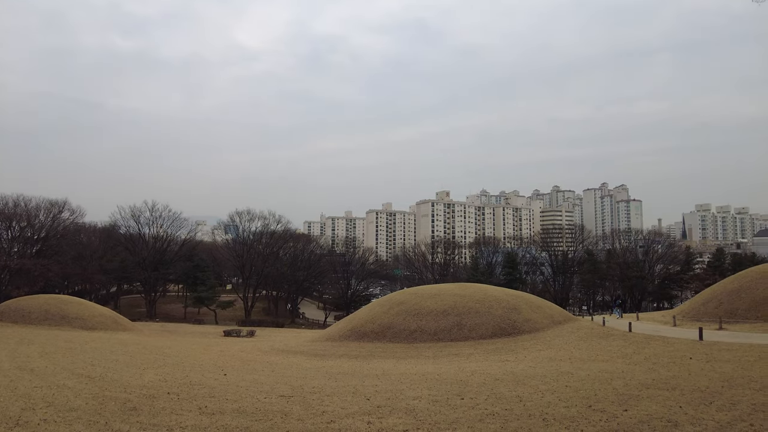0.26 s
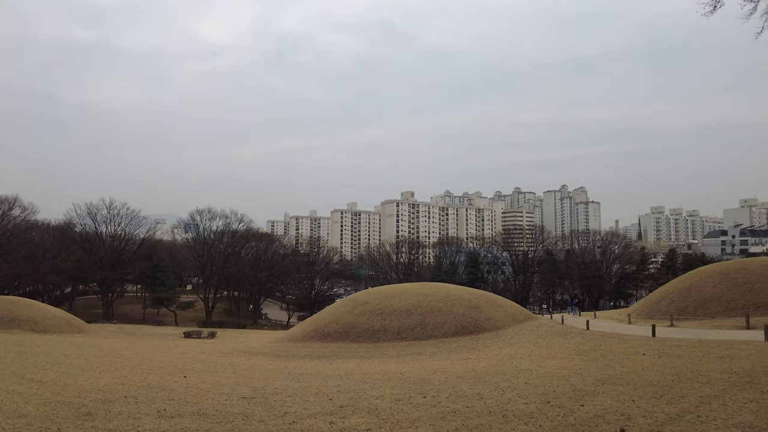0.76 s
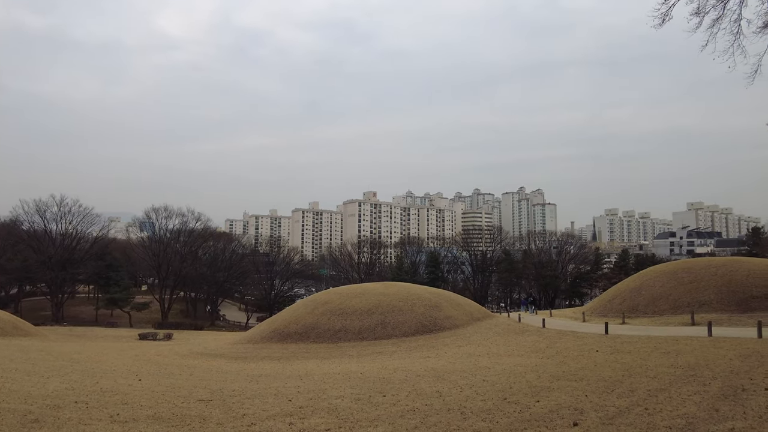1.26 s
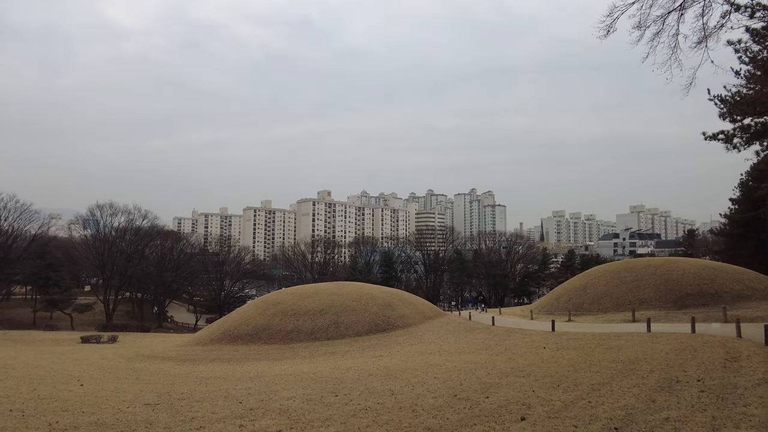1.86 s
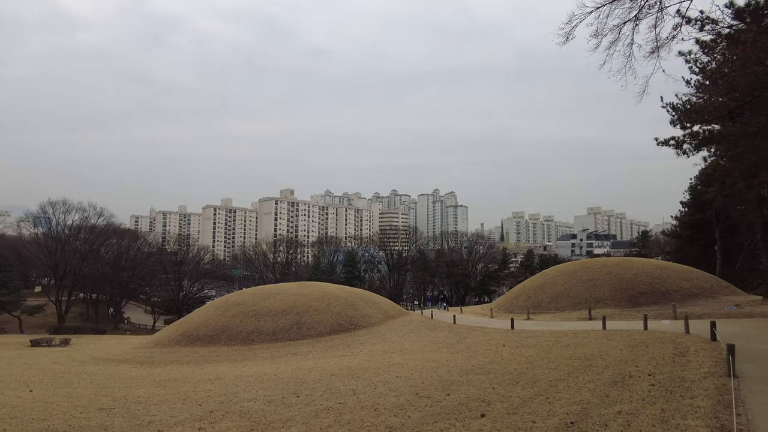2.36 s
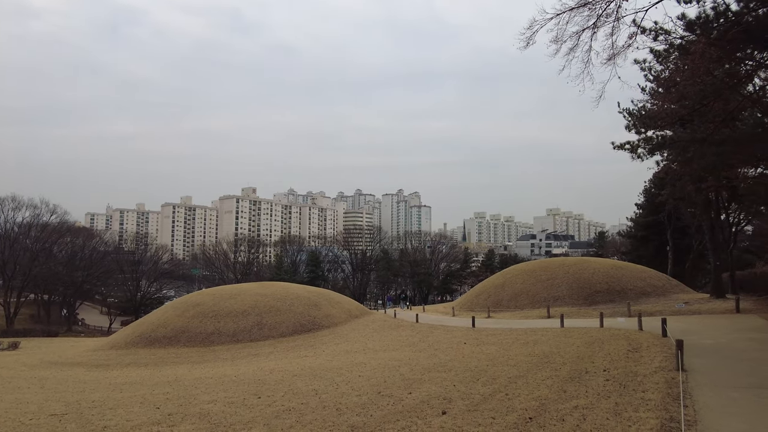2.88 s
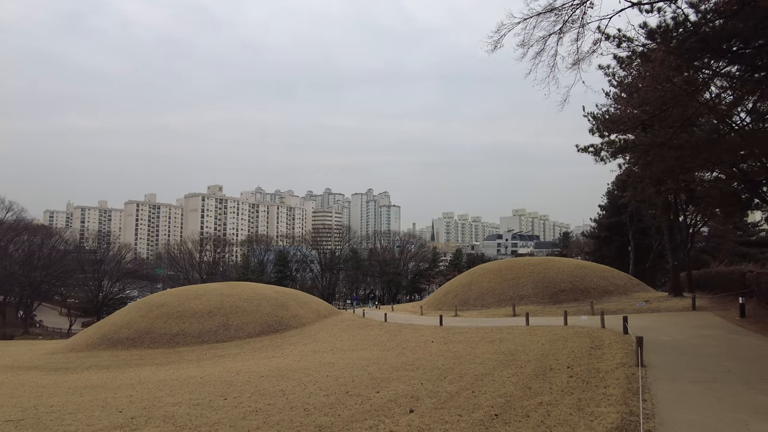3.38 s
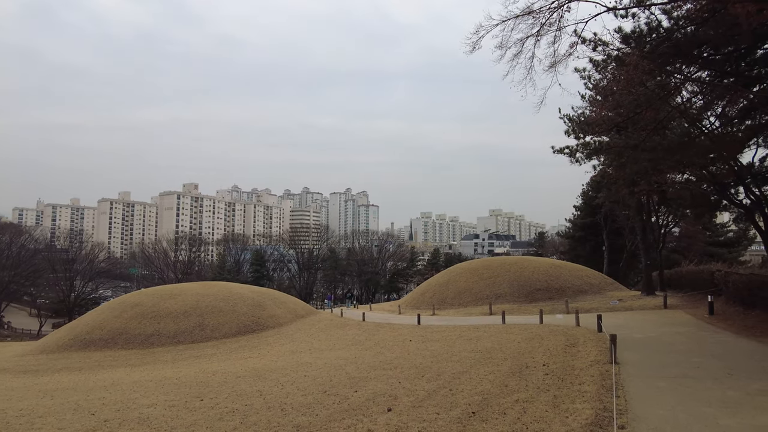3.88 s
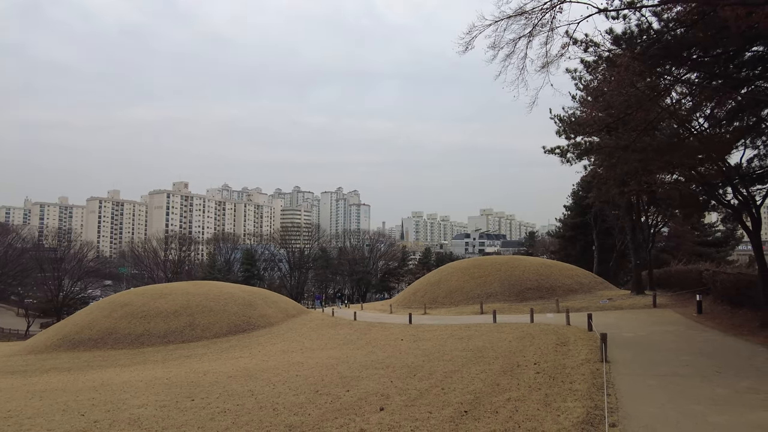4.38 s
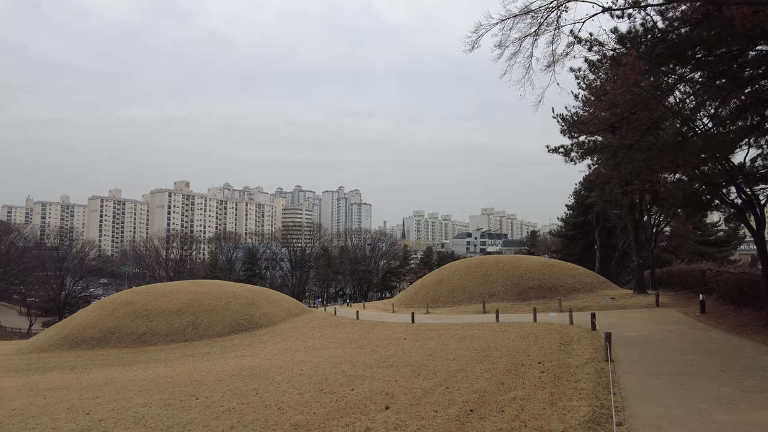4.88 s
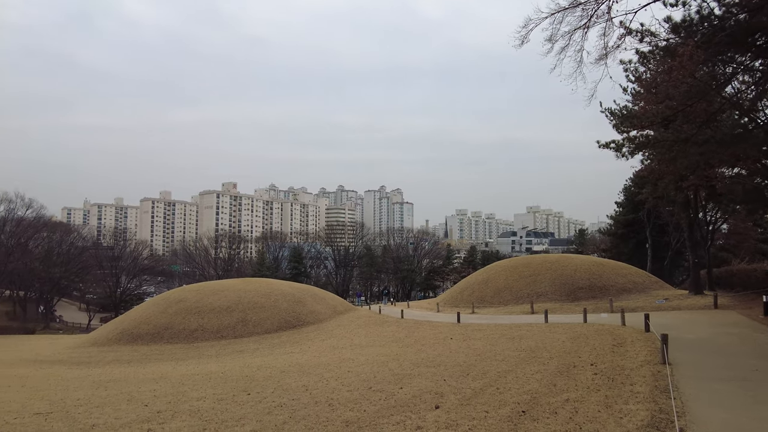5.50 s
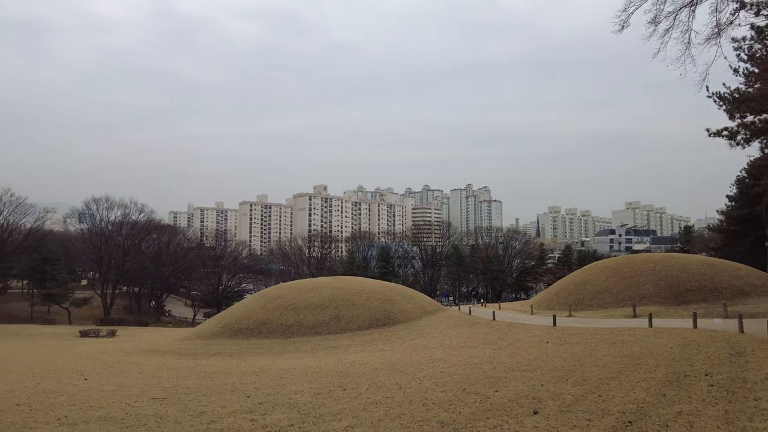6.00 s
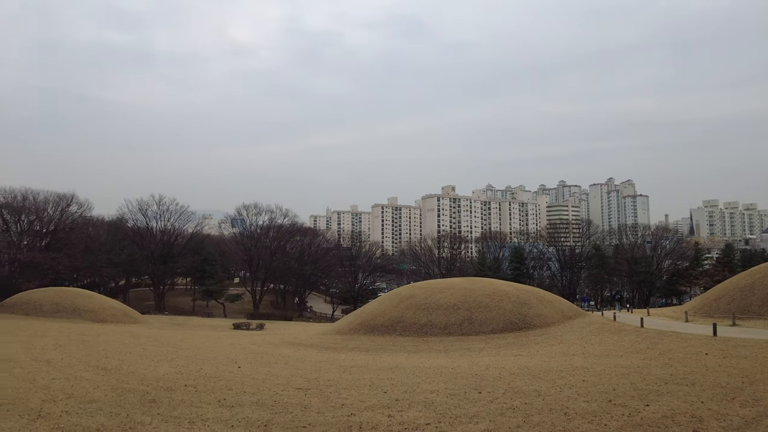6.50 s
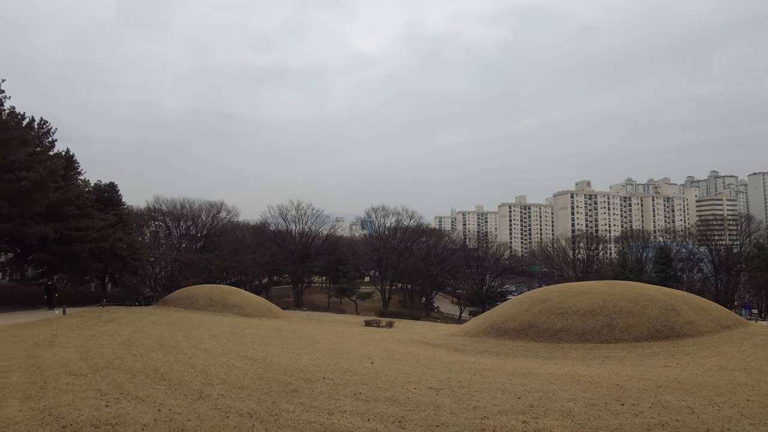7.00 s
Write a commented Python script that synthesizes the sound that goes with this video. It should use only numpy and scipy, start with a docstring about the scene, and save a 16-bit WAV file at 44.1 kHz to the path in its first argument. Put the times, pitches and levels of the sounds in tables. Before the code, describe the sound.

A quiet open park in winter, heard in wide stereo with faint microphone hiss. Throughout, far traffic makes a deep, soft rumble and a dull tyre hush, growing slightly after 4 s. A heavy engine drones very low, a little right of centre, swelling and dipping irregularly. A faint small engine rises in pitch from 0 to 3.6 s; another gathers speed from about 3.3 s onward, with a weak higher hum around 4 s and after 6 s. A small bird gives a quick chirp at 0.35-0.5 s, faint notes at 1.6-2.2 s, some extremely high, and one short chirp near 4.5 s. A barely audible gritty scuff at 1.8 s is followed by tiny step ticks from 3.1 to 6.6 s. From 5.5 s tyre treads sing more, faint wavering tones surface, and a lighter engine hum joins from about 6 s, swelling unevenly to the end.

```python
"""Winter park with distant engines

An open city park in winter, heard through a pair of microphone ports: filtered noise makes the traffic's
rumble and tyre hush behind the trees. Far engines are sums of exhaust orders: a heavy one drones unevenly,
others climb in pitch, and a lighter one joins near the end as the singing of tyre treads grows.
Small birds chirp as gliding near-sines, shoes scuff a paved path as bursts of grainy noise,
and faint wavering tones surface from the roar."""
import sys
import numpy as np
from scipy import signal
from scipy.fft import rfft, irfft
from scipy.io import wavfile

SR = 44100
rng = np.random.default_rng(int(sys.argv[2]) if len(sys.argv) > 2 else 0)


def generate_wav(sig):
    """Save sig (samples, or channels by samples) to the path in sys.argv[1] as 16-bit PCM at SR."""
    pcm = np.round(np.clip(np.atleast_2d(sig).T, -1, 1) * 32767).astype(np.int16)
    wavfile.write(sys.argv[1], SR, pcm)


N = 319725
TIME = np.arange(N) / SR  # seconds
BINS = np.maximum(np.fft.rfftfreq(N, 1 / SR), 1)  # Hz, kept above zero for the logarithms

# The two microphone ports. Each row: frequency in Hz, likeness of the ports from 0 to 1,
# phase by which the left leads in radians, left minus right in dB.
PORT_PAIR = [(50, 0.99, 0, -0.9), (121, .95, 0.42, -0.7), (264, 0.82, -.35, 0), (523, 0.7, -0.64, .3),
             (775, .42, -2.0, 2.8), (984, 0.44, -2.5, 1), (1186, .52, -4, 1), (1220, 0.8, -7, 0),
             (1990, 0.4, -6, -1), (2740, .38, -7.6, -1.5), (4220, 0, -9, -2.2), (8000, .45, -6, -1)]
# Colour of the microphones' own noise. Each row: frequency in Hz, relative level in dB.
HISS_COLOUR = [(100, -4), (9000, -1), (13000, -1), (15500, 2)]

# Far traffic over time. Each row: time in seconds, rumble in dB, tyre roar in dB, both before a fixed lift.
TRAFFIC_LEVELS = [(0, -51.5, -59.5), (2.1, -52, -59), (4.0, -49, -57), (5.7, -51, -57), (6.2, -48.5, -57),
                  (7.25, -50, -57)]
# Colour of the traffic rumble. Each row: frequency in Hz, relative level in dB.
RUMBLE_COLOUR = [(10, -10), (24, 3), (45, -4), (70, -4), (100, -9), (150, -15.5), (225, -17), (300, -24),
                 (400, -25.5), (550, -35.5), (1000, -51), (4000, -85)]
# Colour of the tyre roar. Each row: frequency in Hz, relative level in dB.
TYRE_COLOUR = [(150, -20), (450, -5), (650, -1), (920, -1.5), (1060, -2), (1180, -2.5), (1250, -2),
               (1450, -4.5), (1750, -7), (2300, -16), (2900, -16), (3800, -23), (5000, -28), (7000, -35.5),
               (10000, -43.5), (15000, -57)]
# Singing treads over time. Each row: time in seconds, level in dB.
TREAD_LEVEL = [(0, -79), (5.0, -69), (5.6, -61), (6.2, -63.5), (6.6, -60.5), (7.25, -61.5)]
# Colour of the singing treads. Each row: frequency in Hz, relative level in dB.
SINGING_COLOUR = [(600, -26.5), (800, -2), (950, 4), (1080, -12), (1400, -20), (1650, -2), (2100, -8.5),
                  (2600, -45.5)]
# Faint tones out of the far roar. Each row: start in seconds, length in seconds, mean pitch in Hz,
# peak level in dB before blur and scatter.
ROAR_TONES = [(1.19, .09, 945, -68), (1.759, 0.16, 1270, -64.5), (3.39, .1, 905, -62),
              (4.16, .12, 970, -64), (4.709, 0.092, 902, -64), (5.539, .26, 747.7, -62),
              (5.6, 0.13, 835, -64.5), (5.86, .11, 1205, -61), (6.0, 0.11, 881, -62),
              (6.27, .11, 855, -62.5), (6.501, .16, 945, -64), (6.69, .16, 975, -63.5),
              (6.901, .12, 895, -64.5)]

# Shoes on grit. Each row: start in seconds, length in seconds, level at the crest in dB before scatter.
SHOE_SCUFFS = [(1.795, 0.27, -78.5), (3.138, .02, -77), (3.683, 0.018, -81), (4.183, .018, -79),
               (4.776, 0.026, -76.5), (5.578, 0.019, -81), (5.883, 0.024, -78), (6.607, 0.026, -77)]
# Colour of the grit. Each row: frequency in Hz, relative level in dB.
GRIT_COLOUR = [(1500, -15), (4000, 4), (6300, -1.5), (9000, -7.5), (14000, -8.5)]
# Bird notes. Each row: start in seconds, length in seconds, mid pitch in Hz, glide over the note in Hz,
# sag of both ends in Hz, rms level at the crest in dB before scatter.
BIRD_NOTES = [(0.35, 0.03, 3380, 280, 100, -72), (.378, .085, 3470, 80, 40, -78.5),
              (0.458, .031, 3400, -380, 110, -71.5), (1.185, .075, 11950, -60, 30, -87.5),
              (1.605, .03, 3270, -160, 0, -77.5), (1.835, .03, 3760, -450, 0, -76.5),
              (1.84, 0.17, 11030, 200, 50, -83), (1.96, .07, 12200, -60, 30, -83),
              (2.058, .07, 13050, -52, 30, -86), (2.147, 0.081, 12100, -100, 30, -86),
              (4.472, 0.052, 4245, 400, 75, -70)]

# Engine levels below are before the order levels and the panning.
# A higher engine note that comes through twice. Each row: time in seconds, firing rate in Hz, level in dB.
HIGH_COURSE = [(3.7, 305, -70), (4.05, 296, -57.5), (5.0, 280, -71), (6.2, 297.8, -59),
               (6.75, 308.7, -59.5), (7.25, 284.3, -60)]
# A small engine climbing early on. Each row: time in seconds, firing rate in Hz, level in dB.
SMALL_COURSE = [(0, 170.4, -64), (.4, 170.6, -58), (1.3, 173, -60), (1.7, 173.8, -57.5), (2.3, 197.2, -58),
                (3.0, 205.4, -59), (3.6, 215.8, -66)]
# The single order of both. Each row: multiple of the firing rate, level in dB.
SINGLE_ORDER = [(1, 0)]
# The lighter engine near the end. Each row: time in seconds, firing rate in Hz, level in dB.
LIGHT_COURSE = [(5.8, 107.3, -66), (6.05, 119.7, -47), (6.2, 115.7, -48.5), (6.4, 116.5, -46),
                (6.6, 123.6, -49), (6.72, 126.8, -39), (6.93, 123.5, -42), (7.0, 120.2, -51),
                (7.05, 116, -35.5), (7.12, 115.8, -44), (7.25, 113.9, -37.5)]
# Its exhaust orders. Each row: multiple of the firing rate, level in dB.
LIGHT_EXHAUST = [(1, -1.5), (2, -20.5)]
# An engine gathering speed. Each row: time in seconds, firing rate in Hz, level in dB.
CLIMBING_COURSE = [(3.3, 87.3, -67.5), (3.75, 89.75, -51), (4.6, 97.8, -55), (4.9, 99.43, -51),
                   (5.7, 102.1, -49), (6.5, 110.8, -50.5)]
# Its exhaust orders. Each row: multiple of the firing rate, level in dB.
CLIMBING_EXHAUST = [(1, -3), (2, -13.5)]
# The heavy engine's speed. Each row: time in seconds, firing rate in Hz.
HEAVY_SPEED = [(0, 46.44), (1.08, 44.9), (1.6, 46.26), (2.1, 49.85), (3.05, 53.95), (3.45, 52.5),
               (3.8, 54.97), (4.6, 50.63), (5.0, 48.96), (5.4, 49.97), (5.85, 53), (7.22, 55.3)]
# Its uneven drone. Each row: time in seconds, level in dB.
HEAVY_SWELLS = [(0, -30), (.15, -37.5), (.19, -42.5), (.25, -29), (.41, -27), (.46, -30), (.51, -29),
                (.7, -28), (.81, -35.5), (.93, -28.5), (1.02, -30), (1.07, -33), (1.49, -35.5),
                (1.64, -27.5), (1.76, -38), (1.83, -43), (1.98, -43), (2.05, -33), (2.15, -30), (2.2, -36),
                (2.26, -34), (2.33, -43), (2.38, -30), (2.52, -42), (2.63, -29.5), (2.68, -40.5),
                (2.76, -32.5), (2.83, -36.5), (2.88, -33), (3.03, -28), (3.15, -36), (3.22, -33.5),
                (3.3, -54), (3.43, -25.5), (3.49, -42.5), (3.54, -30), (3.72, -32.5), (3.86, -26.5),
                (3.99, -43), (4.04, -27), (4.13, -31), (4.18, -43.5), (4.35, -28.5), (4.4, -42),
                (4.46, -27.5), (4.53, -33), (4.6, -23.5), (4.65, -38.5), (4.72, -27), (4.77, -40),
                (4.93, -30), (5.1, -41.5), (5.17, -27), (5.33, -35), (5.38, -26), (5.51, -38.5),
                (5.57, -32), (5.64, -45.5), (5.81, -28.5), (5.95, -34.5), (6.1, -48.5), (6.72, -40.5),
                (6.78, -32.5), (6.86, -48.5), (7.17, -32), (7.25, -44)]
# Its exhaust orders. Each row: multiple of the firing rate, level in dB.
HEAVY_EXHAUST = [(1, -0.5), (2, -34), (3, -32.5)]


def undb(db):
    """Decibels to gain."""
    return 10 ** (np.asarray(db) / 20)


def unit(x):
    """Scale to rms 1."""
    return x / np.sqrt(np.mean(x ** 2))


def curves(table):
    """Each column of a timed table, at every sample."""
    seconds, *columns = np.transpose(table)
    return [np.interp(TIME, seconds, column) for column in columns]


def per_bin(table):
    """Each column of a frequency table, at every spectral bin, along a logarithmic axis."""
    hz, *columns = np.transpose(table)
    return [np.interp(np.log(BINS), np.log(hz), column) for column in columns]


def pan(db):
    """Left and right gains for a left-minus-right level difference."""
    return undb(np.array([[db], [-db]]) / 2)


def walk(rate):
    """Smooth random drift that changes about rate times a second; rms 1."""
    spectrum = rfft(rng.standard_normal(N))
    return unit(irfft(spectrum * np.exp(-(BINS / rate) ** 2), N))


def diffuse(colour, flicker_db, flicker_rate):
    """Noise from all around at two partly alike ports; each octave's level wavers by itself."""
    likeness, lead, balance_db = per_bin(PORT_PAIR)
    likeness = np.clip(likeness, 0, 1)
    left, own = rfft(rng.standard_normal((2, N)))
    shared = likeness * np.exp(-1j * lead) * left
    right = shared + np.sqrt(1 - likeness ** 2) * own
    pair = np.array([left * undb(balance_db / 2), right * undb(-balance_db / 2)])
    pair = pair * undb(per_bin(colour)[0])
    out = 0
    for octave in range(3, 15):  # overlapping bands centred on 2 ** octave Hz
        band = np.maximum(1 - abs(np.log2(BINS) - octave), 0)
        out = out + irfft(pair * band, N) * undb(flicker_db * walk(flicker_rate))
    return unit(out)


def outdoors(x, t60, wet_db):
    """Direct sound plus a short scatter from trunks and mounds, different in each ear."""
    t = TIME[:SR]
    tail = rng.standard_normal((2, SR)) * np.exp(-np.log(1000) * t / t60)
    tail = tail / np.sqrt(np.sum(tail ** 2, axis=1, keepdims=True))
    scatter = signal.fftconvolve(x[None], tail, axes=1)[:, :N]
    return x + undb(wet_db) * scatter


def hiss(db):
    """The microphones' own faint noise, independent in each channel."""
    noise = rfft(rng.standard_normal((2, N)))
    return undb(db) * unit(irfft(noise * undb(per_bin(HISS_COLOUR)[0]), N))


def traffic():
    """Many far vehicles merge into a low rumble and an air-dulled tyre roar; treads sing above it."""
    rumble_db, tyre_db = curves(TRAFFIC_LEVELS)
    rumble = diffuse(RUMBLE_COLOUR, flicker_db=0.75, flicker_rate=5) * undb(rumble_db + 12.5)
    tyres = diffuse(TYRE_COLOUR, flicker_db=0.75, flicker_rate=21) * undb(tyre_db + 3.0)
    tread = diffuse(SINGING_COLOUR, flicker_db=1.0, flicker_rate=28) * undb(curves(TREAD_LEVEL)[0])
    return rumble + tyres + tread


def far_tones(width_hz, drift):
    """Short wavering tones, blurred by distance, swell out of the roar and sink back."""
    out = np.zeros(N)
    blur = 1 + .5 * (walk(width_hz) + 1j * walk(width_hz))
    bend = 1 + drift * walk(8)  # pitch factor
    for start, length, hz, db in ROAR_TONES:
        span = (TIME >= start) & (TIME < start + length)
        phase = 2 * np.pi * np.cumsum(hz * bend[span]) / SR
        swell = np.sin(np.pi * (TIME[span] - start) / length)
        out[span] += undb(db) * swell * np.real(blur[span] * np.exp(1j * phase))
    return outdoors(out, t60=.4, wet_db=-0.5)


def footsteps(grain_db):
    """A sole rolls over grit: a short swell of tiny cracks of very unequal size."""
    pressure = np.zeros(N)
    for start, length, db in SHOE_SCUFFS:
        pressure += undb(db) * np.sin(np.pi * np.clip((TIME - start) / length, 0, 1))
    crack_size = undb(grain_db * np.minimum(rng.exponential(size=N), 6))
    cracks = rng.standard_normal(N) * crack_size
    grit = unit(irfft(rfft(cracks) * undb(per_bin(GRIT_COLOUR)[0]), N))
    return outdoors(pressure * grit, t60=.2, wet_db=-11.5)


def birds(warble_hz, warble_depth_hz):
    """Each note is a near sine that glides along an arch with a slight warble."""
    out, warble = np.zeros(N), walk(warble_hz)
    for start, length, pitch_hz, glide_hz, sag_hz, db in BIRD_NOTES:
        span = (TIME >= start) & (TIME < start + length)
        u = (TIME[span] - start) / length  # 0 to 1 through the note
        arch_hz = pitch_hz + glide_hz * (u - .5) - sag_hz * (2 * u - 1) ** 2
        hz = arch_hz + warble_depth_hz * warble[span]
        swell = np.sqrt(2) * abs(np.sin(np.pi * u)) ** 0.82
        out[span] += undb(db) * swell * np.sin(2 * np.pi * np.cumsum(hz) / SR)
    return outdoors(out, t60=.3, wet_db=-6)


def engine(hz, db, orders, fade_rate, rough):
    """Only the lowest exhaust orders carry far; moving air makes them waver, higher multiples more."""
    phase = 2 * np.pi * np.cumsum(hz) / SR
    out = 0
    for multiple, order_db in orders:
        path = 1 + rough * multiple * (walk(fade_rate) + 1j * walk(fade_rate))
        tone = np.real(path * np.exp(1j * multiple * phase))
        out = out + undb(order_db) * unit(tone)
    return out * undb(db)


def high_engine():
    """A single high order, strongly broken up on its way through the air."""
    return engine(*curves(HIGH_COURSE), SINGLE_ORDER, fade_rate=9, rough=0.8)


def small_engine():
    """A single order rising with the engine's speed."""
    return engine(*curves(SMALL_COURSE), SINGLE_ORDER, fade_rate=5.6, rough=0.4)


def light_engine():
    """Two exhaust orders following a lighter engine's speed, a little to the left."""
    return engine(*curves(LIGHT_COURSE), LIGHT_EXHAUST, fade_rate=5, rough=0.18) * pan(.4)


def climbing_engine():
    """Two exhaust orders climb slowly as the engine gathers speed, a little to the right."""
    return engine(*curves(CLIMBING_COURSE), CLIMBING_EXHAUST, fade_rate=3, rough=0.27) * pan(-0.53)


def heavy_engine():
    """A deep drone, right of centre, whose pitch follows the engine's speed as it swells and dips."""
    hz, db = curves(HEAVY_SPEED)[0], curves(HEAVY_SWELLS)[0]
    return engine(hz, db, HEAVY_EXHAUST, fade_rate=5.4, rough=0.031) * pan(-2.3)


def scene():
    """Engines and traffic beyond the park, birds and steps within it."""
    background = hiss(db=-83) + traffic() + far_tones(width_hz=28, drift=.018)
    park = footsteps(grain_db=6) + birds(warble_hz=220, warble_depth_hz=22)
    engines = high_engine() + small_engine() + light_engine() + climbing_engine() + heavy_engine()
    return background + park + engines


def record(dry):
    """The recorder drops the deepest bass and cuts the top."""
    low_cut = signal.butter(2, 14, "high", fs=SR, output="sos")
    top_cut = signal.ellip(8, .2, 70, 15700, fs=SR, output="sos")  # .2 dB ripple, 70 dB down past 15.7 kHz
    return signal.sosfilt(top_cut, signal.sosfilt(low_cut, dry))


dry = scene()
out = record(dry)
generate_wav(out)
```